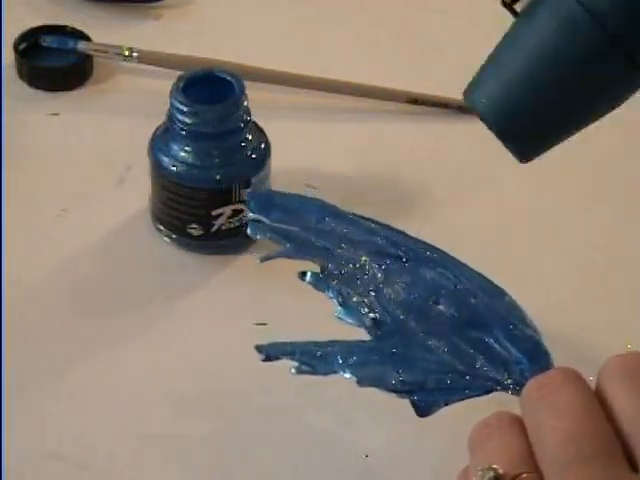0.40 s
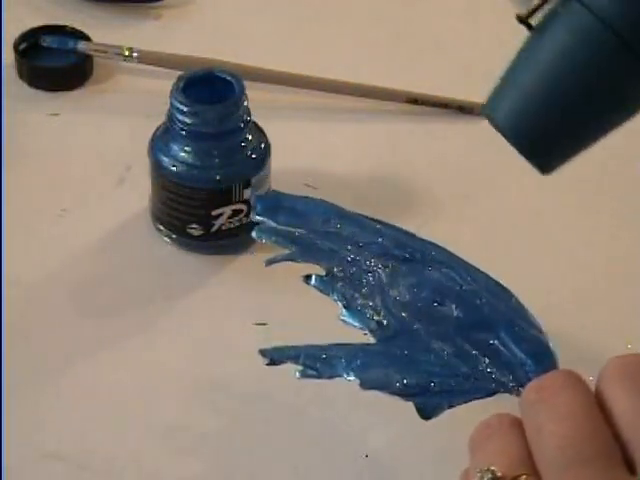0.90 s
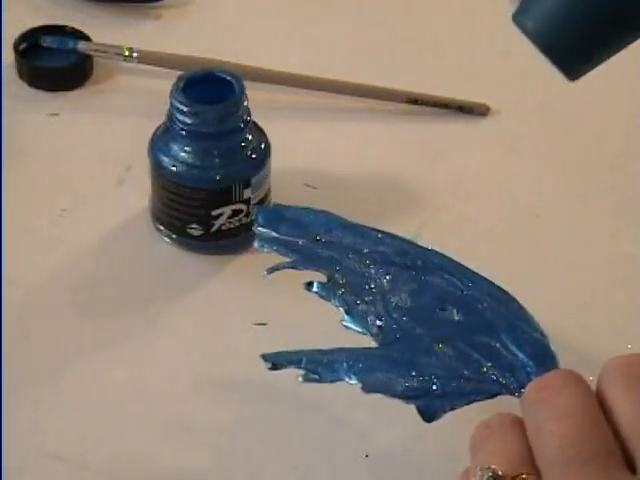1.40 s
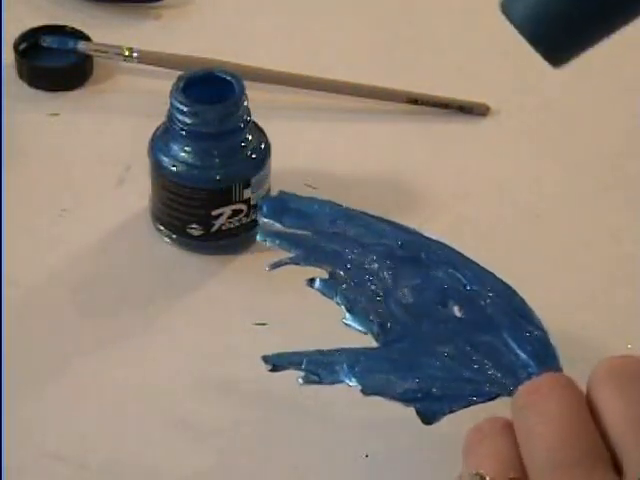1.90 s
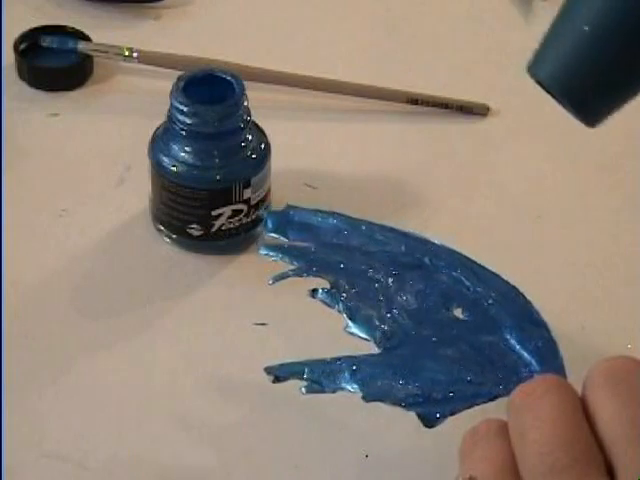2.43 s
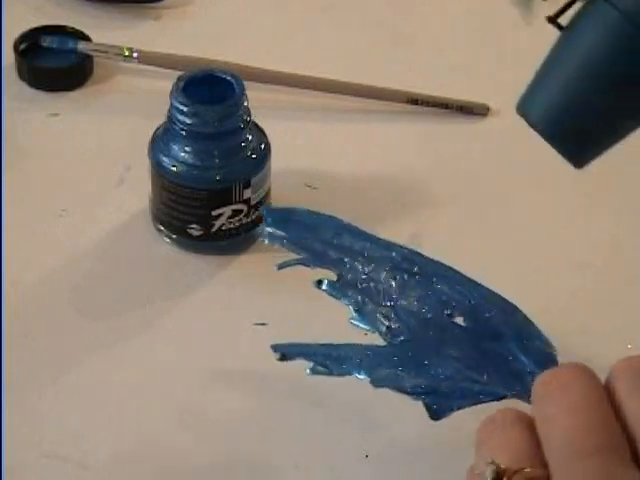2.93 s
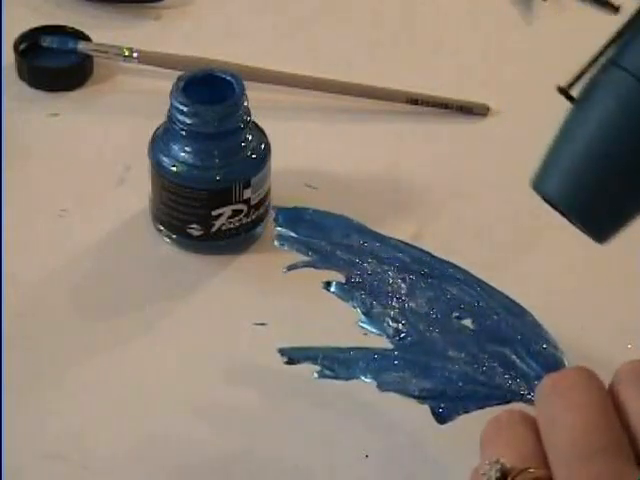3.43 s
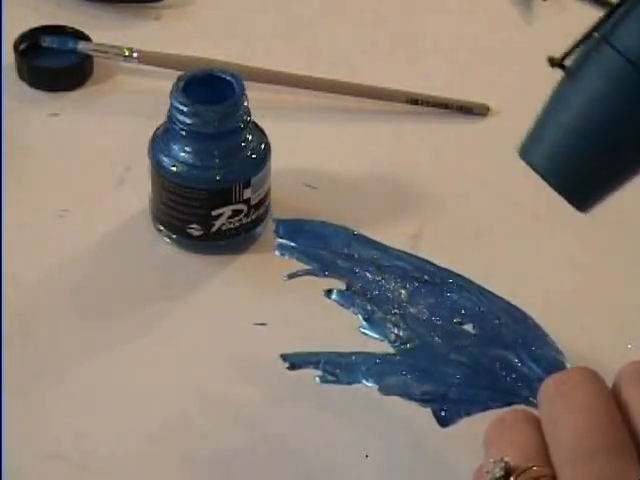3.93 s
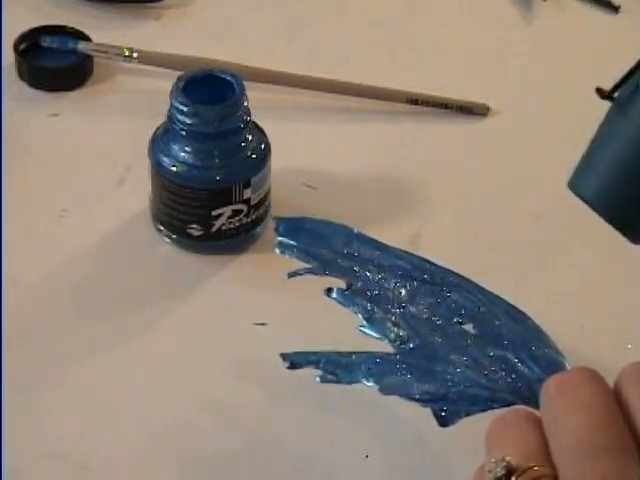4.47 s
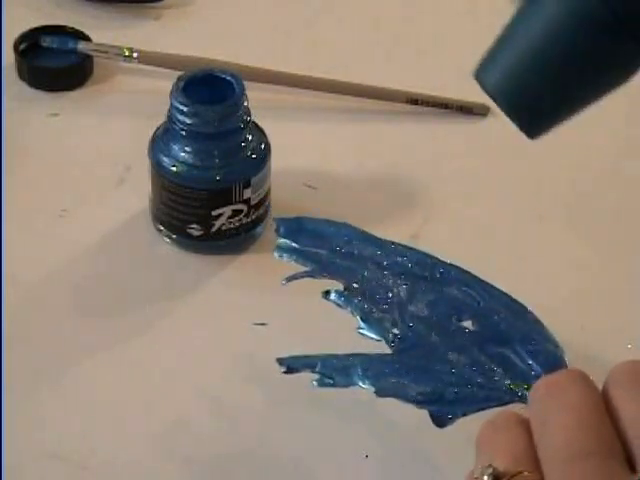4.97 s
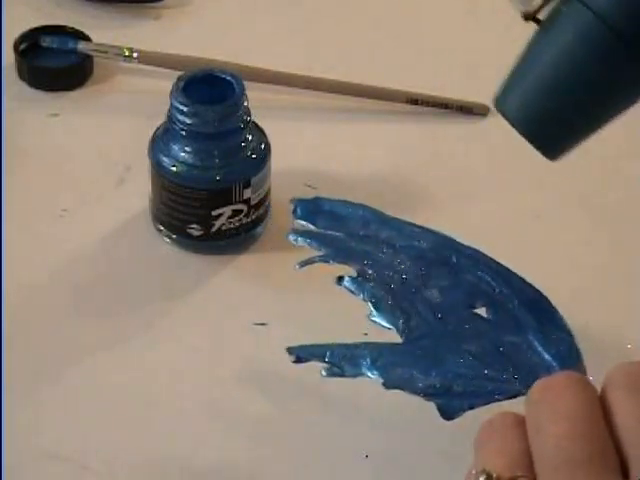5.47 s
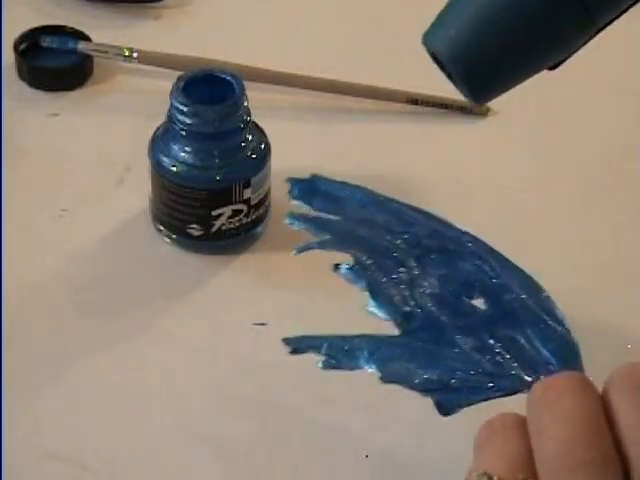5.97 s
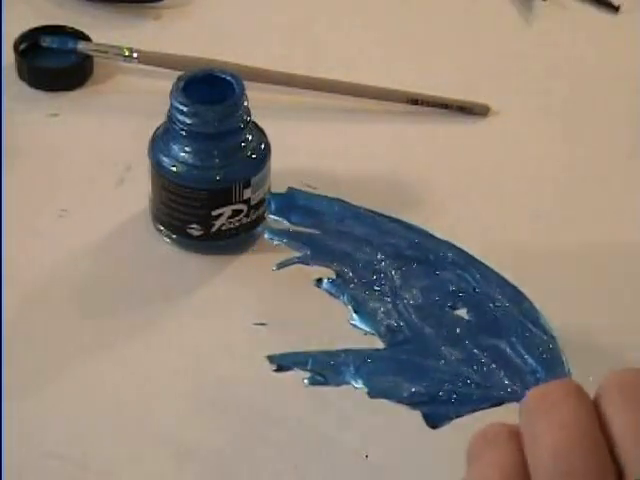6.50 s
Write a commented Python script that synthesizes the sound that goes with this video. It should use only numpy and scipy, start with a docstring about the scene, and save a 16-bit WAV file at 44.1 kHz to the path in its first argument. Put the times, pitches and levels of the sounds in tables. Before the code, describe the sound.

Steady hot-air blower with wavering motor tones and hissing air in a quiet room, switched off at the end with a knock and falling whine.

```python
"""A small quiet room with faint mains hum; a handheld heat gun is waved over a table before a stereo microphone.
From the start its motor sings at multiples of the shaft speed, sines that arrive direct and by the walls.
Air roars in the barrel, washes off the fan and hisses at the nozzle as coloured noise; whistles are jittery sines.
Near the end soft low thumps come from the table, and the switch knocks the housing as the power is cut.
The shaft then coasts: the tones glide down and fade, the air sinks, and the brushes squeak in short chirps."""
import sys
import numpy as np
from scipy import signal
from scipy.fft import rfft, irfft, next_fast_len
from scipy.io import wavfile
from scipy.ndimage import uniform_filter1d

SR = 44100
rng = np.random.default_rng(int(sys.argv[2]) if len(sys.argv) > 2 else 0)


def inscribe(sig):
    """Save sig as 16-bit PCM at rate SR to the path in sys.argv[1].

    A 1-D sig is mono; a 2-D sig holds one channel per row.
    Samples are clipped to [-1, 1] before scaling.
    """
    pcm = np.round(np.clip(np.atleast_2d(sig).T, -1, 1) * 32767)
    wavfile.write(sys.argv[1], SR, pcm.astype(np.int16))


def magnitude_from_level(level_db):
    """Linear magnitude for a level in decibels (20 dB per decade)."""
    exponent = np.asarray(level_db, float) / 20
    return 10 ** exponent


N = 291926
T = np.arange(N) / SR
OFF_S, COAST_S = 6.265, .44  # power is cut; the speed then falls by 1/e in COAST_S


def unit(x):
    """Scale to rms 1."""
    return x / np.sqrt(np.mean(x ** 2) + 1e-20)


def along(points, hz):
    """Read (frequency [Hz], value) points on a log frequency axis."""
    f, v = np.transpose(points)
    return np.interp(np.log(hz + 1), np.log(f + 1), v)


def curves(rows):
    """One value per sample for each column after the time."""
    s, *cols = np.transpose(rows)
    return [np.interp(T, s, c) for c in cols]


def wobble(rate):
    """A random curve through rate knots a second, each drawn with deviation 1."""
    knots = rng.standard_normal(int(N * rate / SR) + 2)
    return np.interp(T * rate, np.arange(len(knots)), knots)


def sides(db):
    """Left and right gains for a left-right difference in dB."""
    return magnitude_from_level(np.array([db / 2, -db / 2]))


# standing waves between table, walls and microphone, and a narrow singing band at 5530 Hz: (frequency [Hz],
# width [Hz], level [dB])
STANDING_WAVES = [(313, 8.5, -10.5), (400, 100, 2.5), (464, 43, 9.5), (505, 67, 8.5), (506, 12, -3.5),
                  (548, 21, -2.5), (567, 42, -2.5), (665, 20, -0.5), (788, 37, -6.5), (847, 16, -3.5),
                  (907, 40, -3), (946, 35, 3), (1057, 25, 1.5), (1257, 30, -3), (1000, 150, 3),
                  (1104, 59, -3), (1310, 17, -2), (1304, 40, 2), (1345, 22, -5.5), (1511, 32, -7.5),
                  (1500, 30, 2), (1628, 48, -6.5), (1605.6, 18, 9), (1700, 4.4, -7.5), (1860, 27, 2.5),
                  (1734, 64, 1.5), (1860, 31, -4), (1880, 130, -1), (2002, 59, -8), (2010, 130, -2),
                  (2100, 28, -4), (2630, 28, 2.5), (2610, 43, -3), (2637, 33, 1), (2774, 76, 1.5),
                  (3375, 120, 2), (3580, 150, -3), (5000, 74, 1.5), (2345, 70, -2.5), (5530, 14, 7.5),
                  (7020, 90, -3.5)]
# dense echoes make the treble jagged: (from frequency [Hz], grain [Hz], depth [dB])
DENSE_ECHOES = (2300, 22, 1.7)
# balance at the microphone: (frequency [Hz], left-right difference [dB])
BALANCE = [(60, -2.5), (100, 2.5), (180, -1), (310, 2.5), (530, -2), (920, 0.5), (1550, 0), (1750, 1.5),
           (2400, 1), (2850, 2.5), (3500, 1), (4600, -.5), (5700, .8), (6200, -.7), (8220, 0.5)]
# phase at the microphone: (frequency [Hz], angle by which left leads [rad])
LEFT_LEAD = [(200, 0.02), (900, .1), (1300, -0.13), (2000, .15), (2700, .1), (3800, .35), (4700, .3),
             (4900, -.1), (5500, .1), (6500, -.05)]


def rush(spectrum, side_spectrum, patchy_db):
    """Stereo noise of rms 1, coloured by its source and the room; narrow bands swell slowly and flare briefly."""
    flare_db = 1.3
    grid = signal.stft(rng.standard_normal((2, N)), nperseg=1024)[2]
    # slow swells differ between mid and side; flares are shared and shorter
    swells = uniform_filter1d(rng.standard_normal(grid.shape), size=3, axis=1)
    swells = uniform_filter1d(swells, size=25, axis=2)
    flares = uniform_filter1d(rng.standard_normal(grid.shape[1:]), size=2, axis=0)
    flares = uniform_filter1d(flares, size=6, axis=1)
    patches = magnitude_from_level(patchy_db * unit(swells) + flare_db * unit(flares))
    noise = signal.istft(grid * patches, nperseg=1024)[1][:, :N]

    m = next_fast_len(N)
    hz = np.fft.rfftfreq(m, 1 / SR)
    waves_db = sum(db * np.exp(-(2 * (hz - centre) / width) ** 2) for centre, width, db in STANDING_WAVES)
    start_hz, grain_hz, depth_db = DENSE_ECHOES
    grains = np.interp(hz / grain_hz, np.arange(1100), rng.standard_normal(1100))
    jagged_db = depth_db * (hz > start_hz) * grains
    # the standing waves colour the mid, the side spectrum sets the width
    colour_db = along(spectrum, hz) + jagged_db + [waves_db, along(side_spectrum, hz)]
    mid, side = rfft(noise, m) * magnitude_from_level(colour_db)
    lead = np.exp(.5j * np.outer([1, -1], along(LEFT_LEAD, hz)))
    pair = np.array([mid + side, mid - side]) * sides(along(BALANCE, hz)) * lead
    return unit(irfft(pair, m)[:, :N])


# colour of the empty room: (frequency [Hz], relative level [dB per Hz])
ROOM_COLOUR = [(20, -56), (40, -28.5), (60, -8.5), (100, -3), (200, 5.5), (600, -8), (3000, -21.5),
               (7700, -19), (8100, -65.5)]
# mains hum: (frequency [Hz], mean level [rms dB])
MAINS_HUM = [(60, -81.5), (120, -66), (180, -78)]


def room():
    """Quiet wide room tone as shaped noise, with mains hum as wavering sines out of phase left to right."""
    hum = np.zeros((2, N))
    for hz, db in MAINS_HUM:
        hum += magnitude_from_level(db + 1.4 * wobble(4.4)) * np.sin(2 * np.pi * hz * T + [[0], [1.2]])
    side_db = [(30, -2), (70, -7.0), (7000, -9), (7850, -30)]  # (frequency [Hz], side below mid [dB])
    return magnitude_from_level(-54.5) * rush(ROOM_COLOUR, side_db, patchy_db=-1.5) + np.sqrt(2) * hum


# shaft under power: (time [s], speed [Hz])
SHAFT_SPEED = [(0, 282.1), (1.0, 282.9), (2.4, 282.4), (2.9, 282.7), (6.2, 282.3)]


def speed():
    """Shaft speed in Hz, decaying exponentially after the cut, and its decades relative to the running speed."""
    run_hz, = curves(SHAFT_SPEED)
    slowing = -np.maximum(T - OFF_S, 0) / COAST_S
    return run_hz * np.exp(slowing), slowing / np.log(10)


# waving strokes, each swells the eighth multiple once:
# (time [s], crest level [rms dB], dip halfway to the next [dB])
WAVING = [(.15, -35.5, 9), (.63, -36.5, 8), (.99, -35, 8), (1.39, -35, 5), (1.72, -33.5, 7), (2.13, -35, 8),
          (2.49, -34.5, 7), (2.78, -34.5, 16), (3.15, -40, 11), (3.5, -42.5, 13), (3.83, -41, 10),
          (4.22, -43.5, 8), (4.52, -38.5, 12), (4.8, -38.5, 9), (5.1, -41.5, 5), (5.43, -36, 10),
          (5.73, -37.5, 8), (6.02, -36, 4), (6.24, -37, 3)]


def strokes():
    """Level of the eighth multiple in dB: a crest at each stroke, a dip halfway to the next."""
    first_dip_db = 20  # before the first crest
    s, crest_db, dip_db = np.transpose(WAVING)
    turn = np.interp(T, np.r_[s[0] - .4, s], np.arange(len(s) + 1))
    depth_db = np.r_[first_dip_db, dip_db, 0][turn.astype(int)]
    return np.interp(T, s, crest_db) - depth_db * np.sin(np.pi * turn) ** 2


# multiples of the shaft speed that swell as the gun is waved: (multiple)
SWELLING_MULTIPLES = [3, 8, 7, 11, 15, 22, 4, 13, 25]
# their place left to right, in the same order: (left-right difference [dB], angle by which left leads [rad])
SWELLING_PLACE = [(4.5, -0.46), (3, 0.1), (3, -0.2), (0.5, .25), (.3, .3), (-2, -.1), (-.3, .01),
                  (1.5, .35), (-.5, .01)]
# third multiple, which the barrel roar follows in part: (time [s], level [rms dB])
THIRD_LEVEL = [(0, -39), (.3, -38), (.7, -37.5), (1.1, -38), (1.6, -45), (1.95, -42), (2.2, -44),
               (2.5, -49), (3.0, -44), (3.4, -38), (3.8, -37.5), (4.05, -39), (4.3, -37.5), (4.9, -38.5),
               (5.2, -45), (5.6, -51), (6.2, -53.5)]
# multiples that change slowly with the pose of the gun:
# (time [s], levels of the 7th, 11th, 15th, 22nd, 4th, 13th, 25th [rms dB])
POSE_LEVELS = [(0, -41, -52, -53, -59, -48, -64, -64), (.5, -39, -50, -56, -59, -46, -57, -63),
               (.9, -39, -50, -58, -65, -46, -54, -64), (1.2, -37.5, -53, -62, -58, -43, -52, -64),
               (1.55, -38, -54, -61, -54.5, -44, -54, -62), (1.72, -43, -55, -61, -52, -45, -57, -62),
               (1.9, -39, -56, -62, -56, -44, -59, -63), (2.1, -41, -55, -64, -55, -48, -60, -64),
               (2.4, -39, -54, -65, -58, -49, -60, -61), (2.72, -45, -55, -60, -62, -45, -58, -60),
               (2.95, -36, -54, -58, -59, -44, -57, -59), (3.4, -39.5, -59, -59, -75, -46, -61, -59),
               (3.7, -37.5, -59, -58, -69, -46, -59, -67), (4.2, -39.5, -66, -51.5, -64, -46, -61, -68),
               (4.6, -40, -58, -50.5, -60, -45, -61, -64), (5.1, -40, -53, -58, -57, -45, -56, -63),
               (5.5, -40, -53, -62, -58, -45, -61, -59), (5.75, -41, -52, -61, -72, -45, -62, -54.5),
               (6.0, -40, -51, -62, -60, -46, -61, -55), (6.2, -42, -54, -67, -62, -48, -62, -61)]
# weaker multiples that flutter at random: (multiple)
WEAK_MULTIPLES = [2, 5, 6, 9, 10, 12, 14, 16, 20, 21, 23, 24, 26]
# the same in order: (level before flutter and resonance [rms dB], left-right difference [dB])
WEAK_LEVELS = [(-41.5, 0), (-57, 8), (-49.5, 5.5), (-55.5, 0), (-55, 0.5), (-59.5, .1), (-62, -1.5),
               (-60.5, -6.5), (-66.5, .1), (-69.5, -1.5), (-69, .1), (-66.5, -0.2), (-69, .1)]
# housing resonances that light up a weak multiple gliding through: (frequency [Hz], half width [Hz], gain [dB])
HOUSING_RESONANCES = [(2200, 90, 24), (465, 45, 15)]


def motor():
    """Sines locked to the shaft angle; after the cut they glide down while the room lets the old pitch die away."""
    room_share, room_t60_s = .56, .34  # part of each tone that arrives by the walls, and its decay
    hum_db, hum_room_share = -35.5, .1  # shaft hum [mean rms dB], part of it that arrives by the walls
    tone_fade_db, hum_fade_db = 86, 150  # dB lost per decade of speed
    shaft_hz, decades = speed()
    waver_hz = 0.26 * wobble(30)
    run_hz, = curves(SHAFT_SPEED)
    angle = 2 * np.pi * np.cumsum(shaft_hz + waver_hz) / SR
    held_angle = 2 * np.pi * np.cumsum(run_hz + waver_hz) / SR  # the old pitch, still in the room
    since_off = np.maximum(T - OFF_S, 0)
    direct = (1 - room_share) * magnitude_from_level(tone_fade_db * decades)
    room_decay = magnitude_from_level(-60 * since_off / room_t60_s)

    def tone(k, phase):
        """The kth multiple, straight from the gun and by way of the walls."""
        by_walls = room_share * room_decay * np.sin(k * held_angle + phase)
        return direct * np.sin(k * angle + phase) + by_walls

    hum_gain = magnitude_from_level(hum_db + .3 * wobble(2.0))
    hum_direct = (1 - hum_room_share) * magnitude_from_level(hum_fade_db * decades) * np.sin(angle + [[.04], [-.04]])
    out = hum_gain * (hum_direct + hum_room_share * room_decay * np.sin(held_angle))

    levels = [*curves(THIRD_LEVEL), strokes(), *curves(POSE_LEVELS)]
    for k, db, (pan_db, lead) in zip(SWELLING_MULTIPLES, levels, SWELLING_PLACE):
        flutter_db = .9 * wobble(9) + 1.9 * wobble(28)
        phase = 0.091 * wobble(25) + [[lead / 2], [-lead / 2]]
        out += magnitude_from_level(db + flutter_db) * sides(pan_db)[:, None] * tone(k, phase)

    for k, (db, pan_db) in zip(WEAK_MULTIPLES, WEAK_LEVELS):
        # the path length changes with the waving
        drift = rng.uniform(0, 2 * np.pi) + 0.6 * wobble(6)
        flutter_db = 1.5 * wobble(4)
        ring_db = sum(gain_db * np.exp(-((k * shaft_hz - centre) / width) ** 2)
                      for centre, width, gain_db in HOUSING_RESONANCES)
        out += magnitude_from_level(db + flutter_db + ring_db) * sides(pan_db)[:, None] * tone(k, drift)
    return np.sqrt(2) * out


# barrel roar, fan wash, heater coil, nozzle hiss:
# (base level at full speed [rms dB], loss per decade of speed [dB])
AIR_LEVELS = [(-31, 33), (-31, 31.5), (-39, 78), (-40, 54)]
# level added to the air round the heater coil: (time [s], level [dB])
COIL_CHANGE = [(0, 3.5), (.5, 0), (1.4, 2.5), (2.8, 1), (3.2, -1.5), (4.8, -1.5), (5.6, -0.5), (6.0, 1.5),
               (6.2, 1.5)]
# colours of the four air sounds: (frequency [Hz], relative level [dB per Hz])
ROAR_COLOUR = [(71, -60), (120, -30.5), (226, -16.5), (250, -13.5), (279, -8), (306, -12), (336, -10.5),
               (512, -10.5), (576, 8.5), (900, -6), (1170, -41.5), (1980, -120)]
WASH_COLOUR = [(470, -39.5), (800, -4.5), (926, -10.5), (1020, -3.5), (1870, 0), (1930, 1.5), (2090, -5),
               (2300, -8.5), (2990, -29), (5060, -120)]
COIL_COLOUR = [(1350, -42.5), (2300, -0.5), (2410, -5.5), (2730, -3.5), (3050, -19), (3960, -41),
               (6710, -120)]
HISS_COLOUR = [(1790, -29), (3050, 1.5), (3340, 4), (3870, -6.5), (4660, -1), (4920, -0.5), (5940, -9),
               (7170, -5.5), (7700, -14), (7990, -30), (8300, -65), (10800, -75.5), (18300, -120)]
# stereo width of the air: (frequency [Hz], side below mid [dB])
AIR_WIDTH = [(150, -11.5), (300, -14.5), (700, -19.5), (900, 0), (1050, -12), (1280, -8.5), (1550, -9.5),
             (1800, -5.5), (2100, -8.5), (3200, -13), (4000, -10), (4600, -11.5), (4800, -3.5), (5000, -12),
             (5600, -9), (6500, -11), (7650, -16), (7850, -36.5)]


def air():
    """Turbulence in the barrel, at the fan, round the heater coil and at the nozzle; it sinks with the fan speed."""
    lag_s = 0.039  # the air follows the fan late
    roar_follows, sputter_db = .12, 14  # share of the third multiple's dB; flutter per decade of speed lost
    decades = np.interp(T - lag_s, T, speed()[1])
    roar_db, wash_db, coil_db, hiss_db = [db + fade_db * decades for db, fade_db in AIR_LEVELS]
    third_db, = curves(THIRD_LEVEL)
    roar_db = roar_db + roar_follows * (third_db - third_db.mean()) + sputter_db * decades * wobble(22)
    coil_db = coil_db + curves(COIL_CHANGE)[0]
    roar = magnitude_from_level(roar_db) * rush(ROAR_COLOUR, AIR_WIDTH, patchy_db=.5)
    wash = magnitude_from_level(wash_db) * rush(WASH_COLOUR, AIR_WIDTH, patchy_db=0.5)
    coil = magnitude_from_level(coil_db) * rush(COIL_COLOUR, AIR_WIDTH, patchy_db=1.3)
    hiss = magnitude_from_level(hiss_db) * rush(HISS_COLOUR, AIR_WIDTH, patchy_db=1.5)
    return roar + wash + coil + hiss


# nozzle whistles, one list each, before jitter: (time [s], frequency [Hz], level [rms dB])
NOZZLE_WHISTLES = [
    [(0, 4800, -56), (.9, 4820, -54), (1.1, 4990, -53), (2.4, 5020, -53), (3.1, 4950, -59),
     (3.4, 4920, -55), (4.9, 4950, -53), (5.3, 4850, -56), (6.2, 4880, -55), (6.32, 4880, -51),
     (6.38, 4800, -72)],
    [(0, 4500, -58), (2.9, 4550, -60), (3.3, 4720, -52), (4.7, 4700, -53), (5.1, 4550, -57),
     (6.25, 4500, -57), (6.4, 4400, -75)],
    [(0, 7420, -66), (2.5, 7420, -65), (3.1, 7420, -70), (5.8, 7420, -66), (5.95, 7430, -61),
     (6.25, 7430, -61), (6.3, 7400, -90)],
    [(5.2, 1640, -65), (5.6, 1610, -43), (5.75, 1610, -36.5), (5.88, 1570, -39), (6.0, 1560, -40),
     (6.1, 1560, -60), (6.62, 1560, -90)],
    [(5.6, 1670, -65), (5.82, 1670, -39), (5.95, 1660, -41), (6.05, 1680, -39), (6.12, 1670, -43),
     (6.24, 1690, -37), (6.28, 1690, -46), (6.36, 1670, -50), (6.62, 1600, -75)],
    [(0, 2780, -46), (.2, 2780, -45), (.4, 2800, -56), (3.0, 2800, -58), (3.9, 2800, -54),
     (4.11, 2800, -44), (4.28, 2800, -58), (4.47, 2790, -45), (4.63, 2800, -56), (4.81, 2810, -45),
     (5.0, 2800, -58), (6.25, 2780, -56), (6.4, 2700, -80)],
]
# pitch jitter of each whistle: (deviation at the random knots [Hz])
WHISTLE_JITTER = [30, 20, 8, 34, 30, 35]


def whistles():
    """Air whistles past edges in the nozzle: tones whose pitch and size jitter fast."""
    out = np.zeros(N)
    for rows, spread_hz in zip(NOZZLE_WHISTLES, WHISTLE_JITTER):
        hz, db = curves(rows)
        gain = magnitude_from_level(db + 3 * wobble(60))
        angle = 2 * np.pi * np.cumsum(hz + spread_hz * wobble(150)) / SR
        out += gain * np.sin(angle)
    return np.sqrt(2) * out * sides(-1.2)[:, None]


# thumps on the table: (time [s], level before onset and roughness [dB], frequency [Hz])
TABLE_THUMPS = [(5.935, -45, 99), (6.245, -48, 95), (6.41, -44, 102), (6.545, -45, 101)]


def thumps():
    """Soft low knocks that start gently: a dull decaying pitch, roughened by a random curve into a low puff."""
    out = np.zeros(N)
    for s, db, hz in TABLE_THUMPS:
        t = np.maximum(T - s, 0)
        onset = 1 - np.exp(-t / 0.012)
        rough = .7 + .7 * wobble(170)
        out += magnitude_from_level(db - 60 * t / 0.37) * onset * rough * np.sin(2 * np.pi * hz * t)
    return out


# knock of the switch: (time [s], level before the rise [dB], frequency [Hz], 60 dB decay [s], rise [s])
SWITCH_KNOCK = (6.262, -16.5, 825, .12, .014)


def switch():
    """One short pitched knock of the plastic housing: a sine that rises softly and decays at once."""
    s, db, hz, t60, rise = SWITCH_KNOCK
    t = np.maximum(T - s, 0)
    return magnitude_from_level(db - 60 * t / t60) * (1 - np.exp(-t / rise)) * np.sin(2 * np.pi * hz * t)


# brush squeak while coasting:
# (time [s], frequency [Hz], slide [Hz per s], half length [s], level before roughness [dB])
BRUSH_CHIRPS = [(6.357, 6850, -7000, .022, -51), (6.41, 6320, -1500, 0.02, -52),
                (6.478, 6380, -2500, 0.023, -55), (6.505, 6120, -8000, 0.018, -56.5),
                (6.505, 5200, -6000, .015, -58), (6.55, 6400, -9500, 0.021, -49.5),
                (6.6, 6200, -7000, 0.018, -59)]
# brush scrape while coasting: (frequency [Hz], knots of the noise [per s], level [dB], time [s])
BRUSH_SCRAPE = [(6250, 700, -55.5, 6.52), (4900, 1200, -61, 6.5)]


def squeak():
    """The brushes chirp on the slowing commutator: short falling rough tones, over a scraping band of noise."""
    chirps, scrape = np.zeros(N), np.zeros(N)
    for s, hz, slide, half_length, db in BRUSH_CHIRPS:
        near = slice(round((s - .06) * SR), round((s + .06) * SR))
        t = T[near] - s
        swell = np.exp(-(t / half_length) ** 2)
        chirps[near] += magnitude_from_level(db) * swell * np.sin(2 * np.pi * (hz + slide * t / 2) * t)
    for hz, width, db, s in BRUSH_SCRAPE:
        swell = np.exp(-((T - s) / .13) ** 2)
        scrape += magnitude_from_level(db) * swell * wobble(width) * np.sin(2 * np.pi * hz * T)
    rough = 1 + .9 * wobble(600)
    return (chirps * rough + scrape) * sides(-.6)[:, None]


def scene():
    """Room, gun and table together at the microphone."""
    return room() + motor() + air() + whistles() + thumps() + switch() + squeak()


def band_limit(x):
    """A steep low-pass at the top of the band."""
    return signal.sosfilt(signal.butter(12, 8820, fs=SR, output="sos"), x)


def record(dry):
    """The finished stereo mix."""
    return band_limit(dry)


dry = scene()
out = record(dry)
inscribe(out)
```